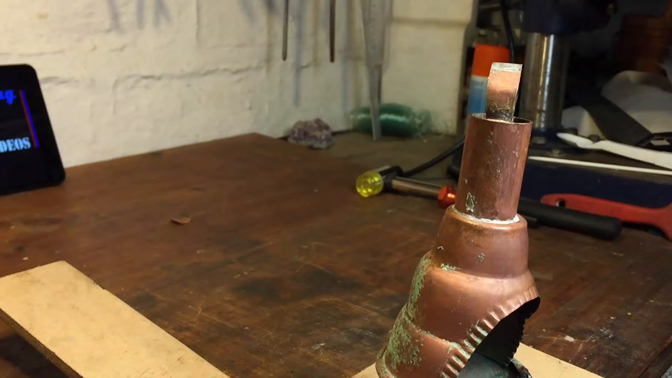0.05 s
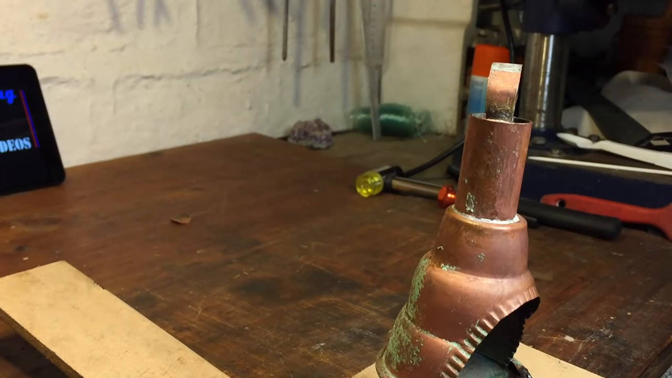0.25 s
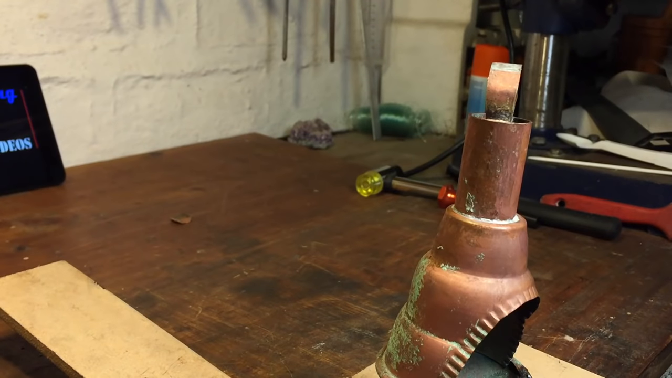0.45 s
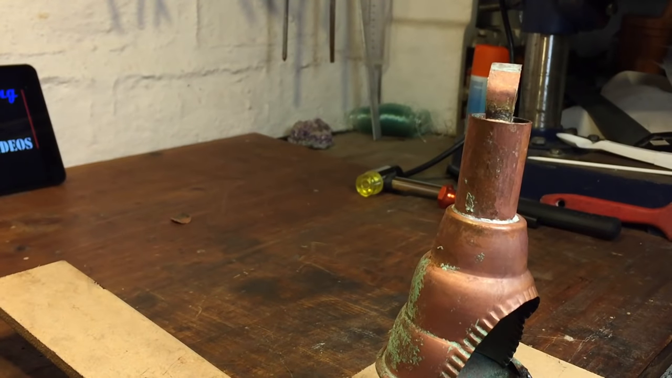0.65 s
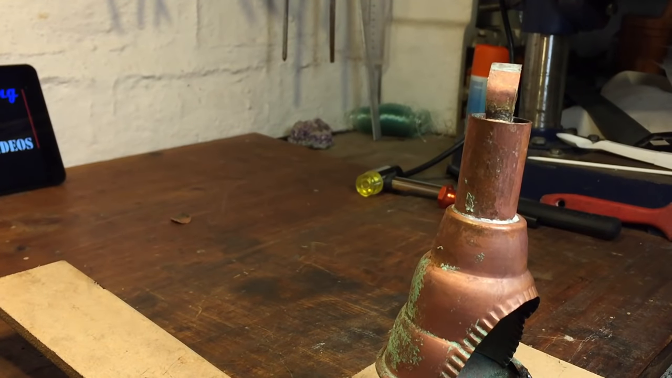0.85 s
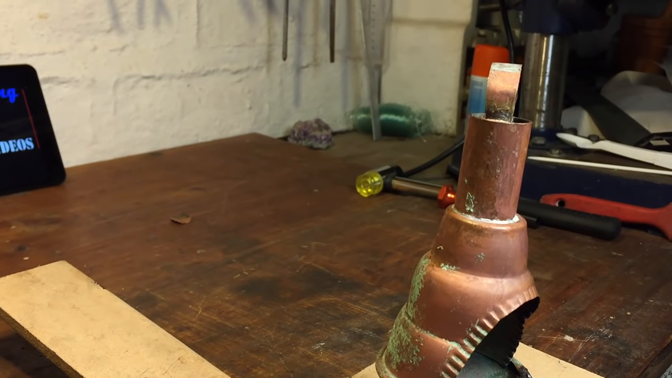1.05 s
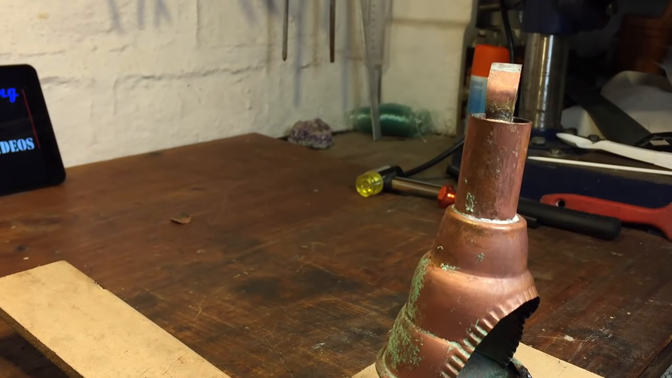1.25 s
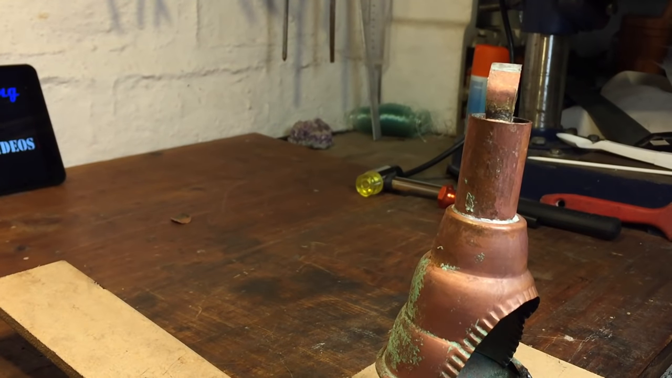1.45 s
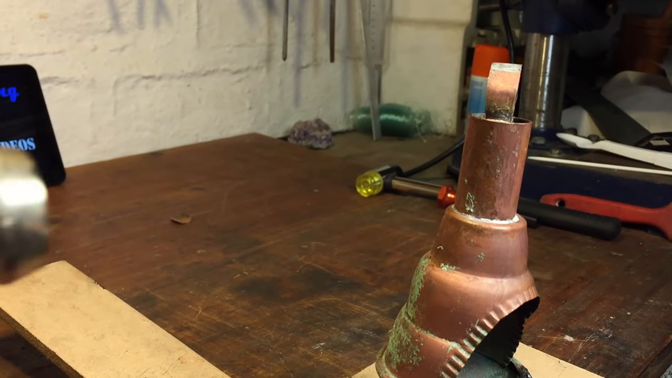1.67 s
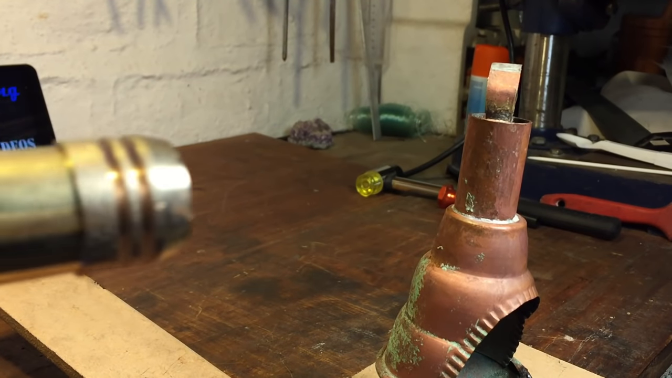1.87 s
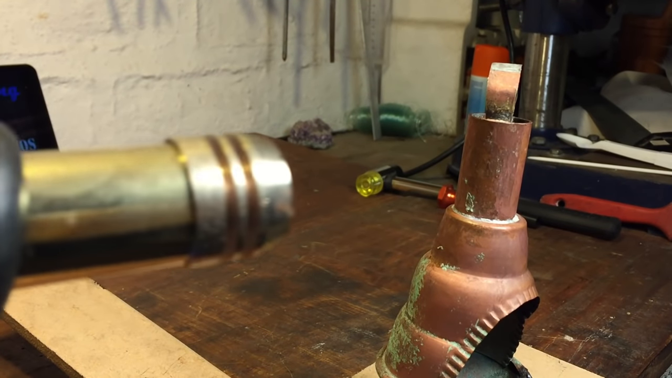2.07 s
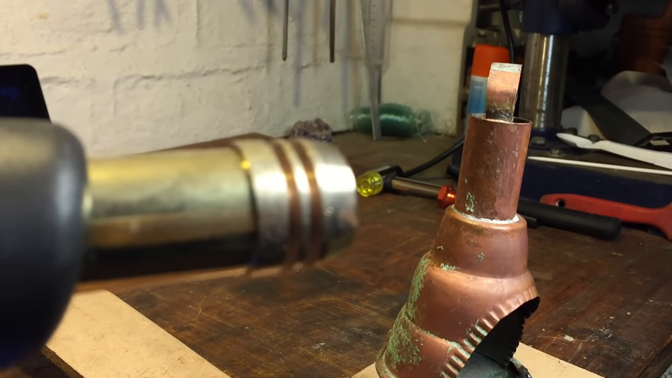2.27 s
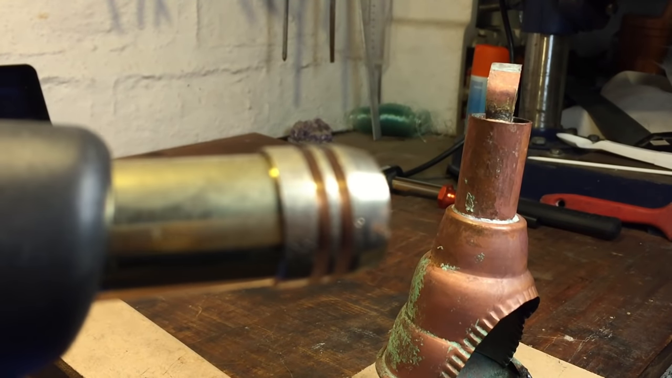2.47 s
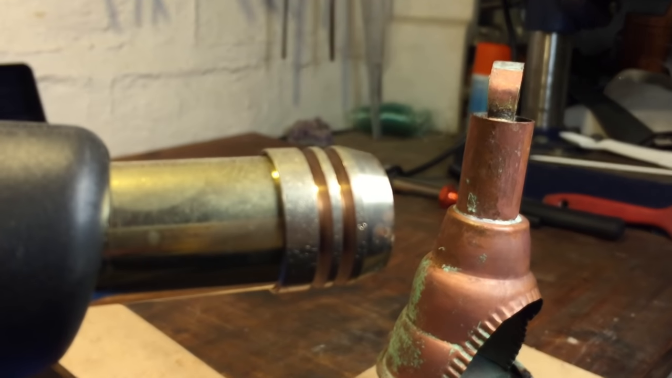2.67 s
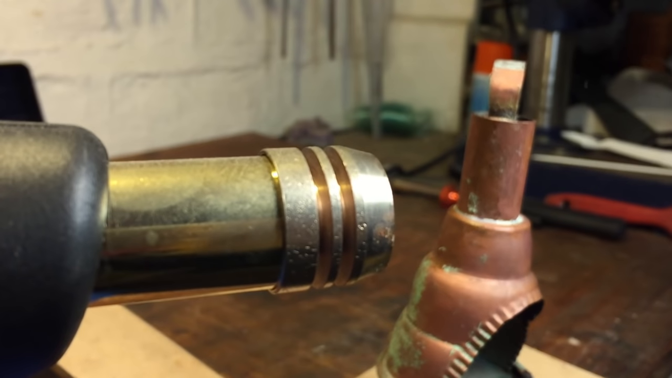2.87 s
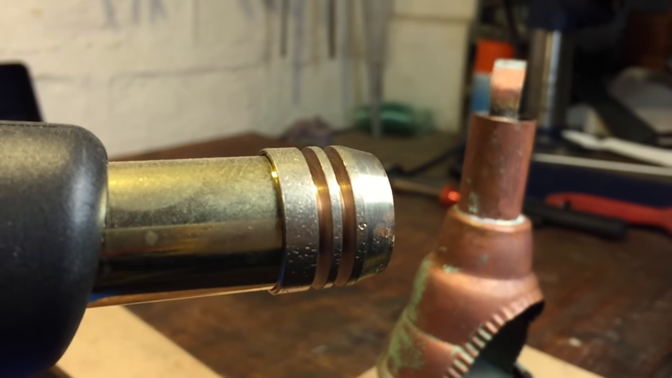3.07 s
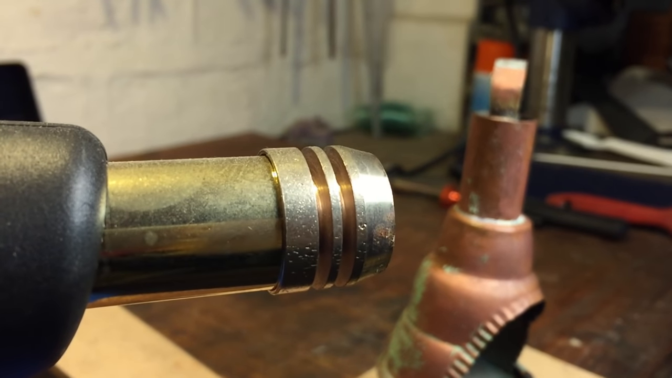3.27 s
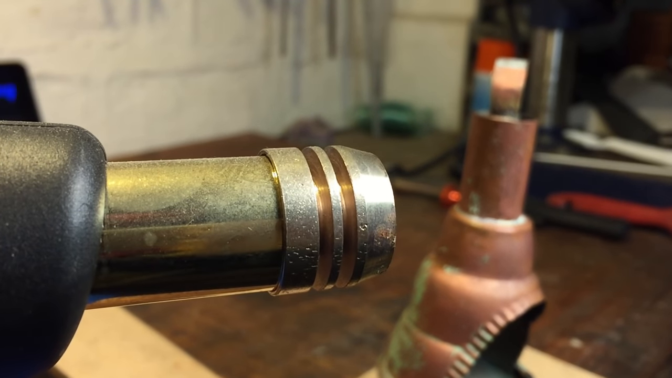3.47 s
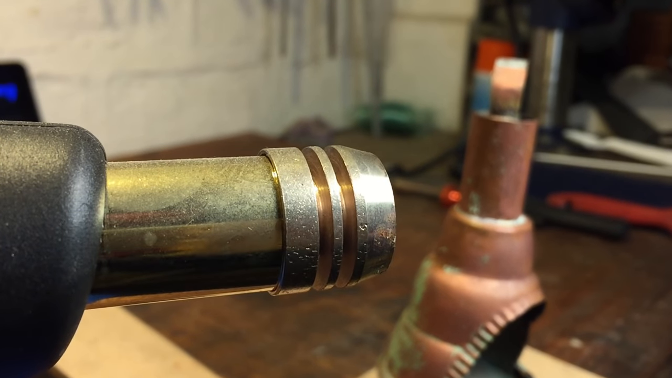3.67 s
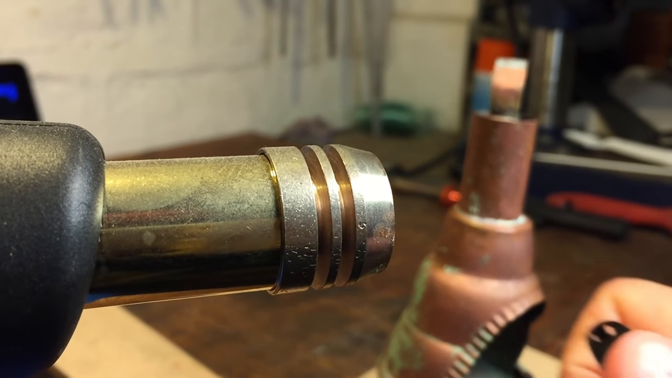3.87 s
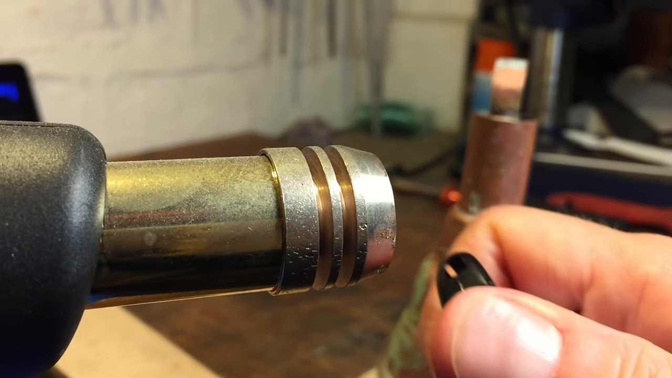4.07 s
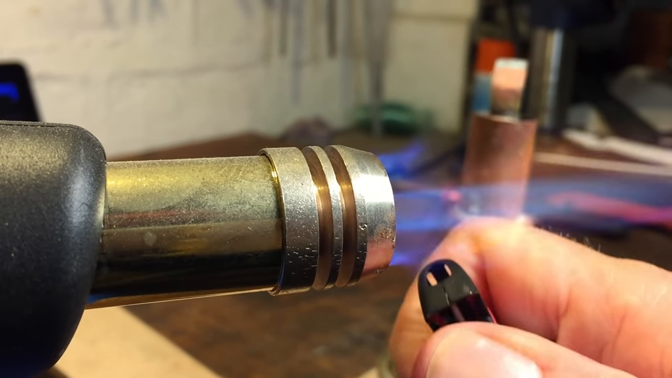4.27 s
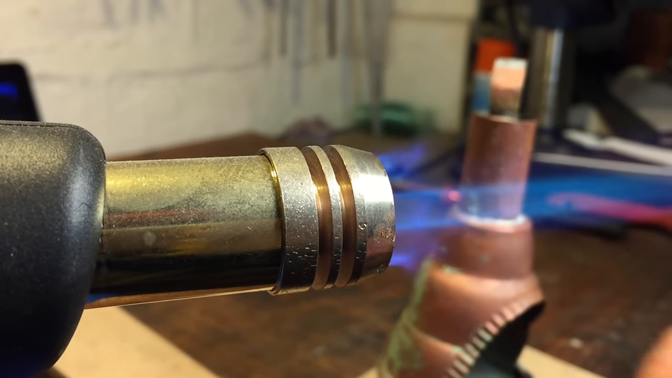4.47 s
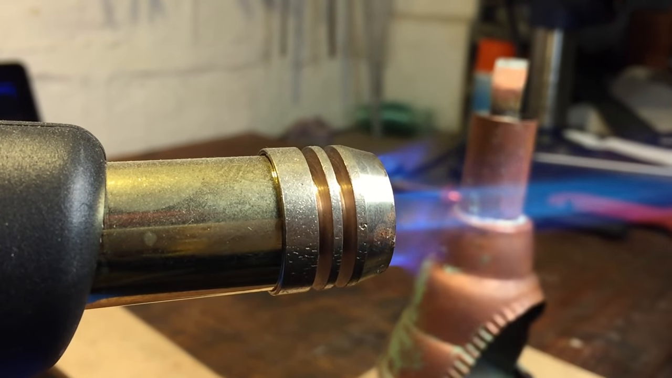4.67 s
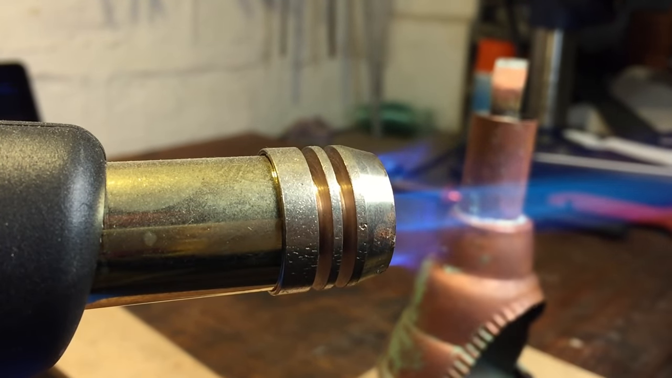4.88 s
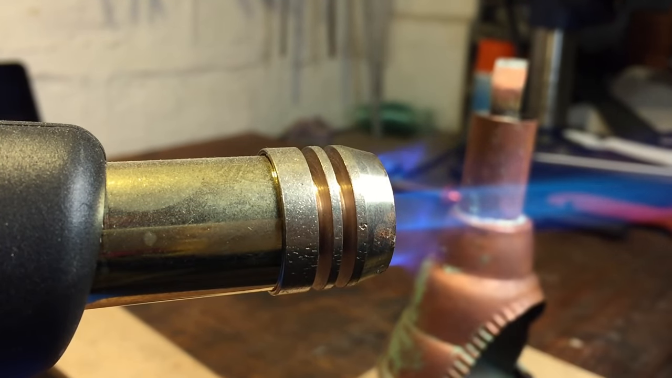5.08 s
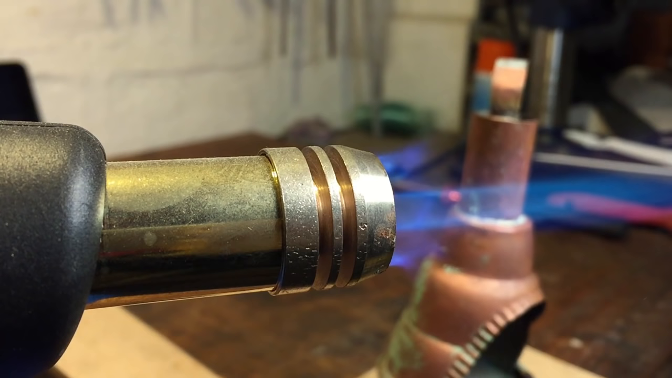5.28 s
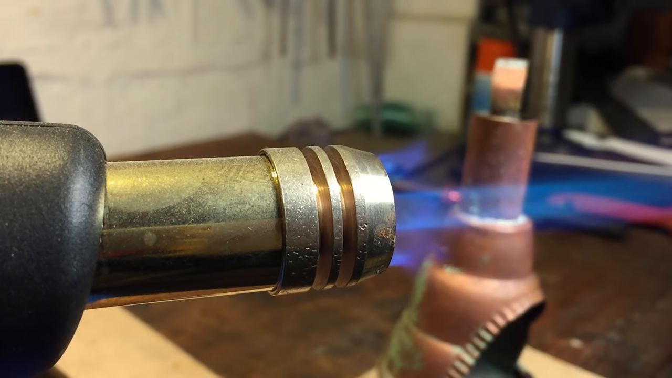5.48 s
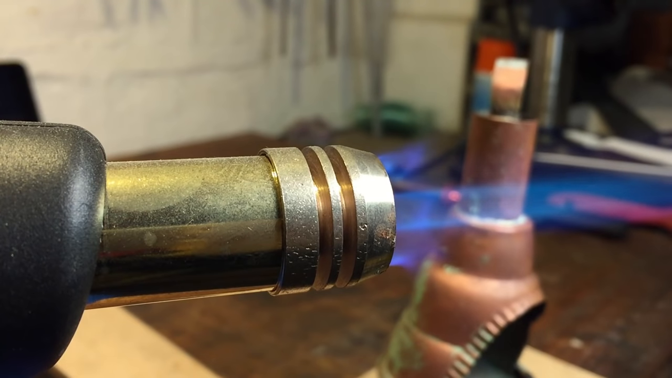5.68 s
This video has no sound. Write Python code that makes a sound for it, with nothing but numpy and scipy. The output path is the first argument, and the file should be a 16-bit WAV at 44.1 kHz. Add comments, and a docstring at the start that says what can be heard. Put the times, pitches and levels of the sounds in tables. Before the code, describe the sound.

A close recording in a quiet workshop, with birds outside spread wide in stereo. Soft low room tone drops out at about 0.1 s and returns much fainter at 0.65 s. Falling whistles, stronger on the left, come at 0.3, 0.8 and 1.4 s, with long echoes; faint low throbs lean right. From 1.2 to 2.5 s a torch base slides over a wooden bench, a soft woody rub with gritty hiss, fullest near 1.6 s. Chirps, warbles, a dim coo and a faint trill continue until about 4 s, among barely audible handling ticks. At 3.96 s gas hisses out abruptly, bright and whistly. A lighter clicks sharply at 4.04 s, weakly at 4.21 s, then hard at 4.25 s as the gas catches with a short, punchy thump and brief flare. A steady fluttering roar with bright hiss follows to the end; one more sharp click at 4.48 s.

```python
"""A gas torch in a workshop: the valve opens with a hiss, a lighter is struck, the gas catches with a thump
and burns with a steady roar. Jet and roar are shaped noise, the thump is a drawn pressure pulse.
Before that the torch slides across a wooden bench: random grains ringing modes, with hiss above.
Birds outside are gliding near-sines with echoes. Indoor sounds are mono, the birds wide, low throbs lean
right; the room tone drops out for half a second near the start."""
import sys
import numpy as np
from scipy import signal
from scipy.fft import rfft, irfft, next_fast_len
from scipy.io import wavfile

SR = 44100
rng = np.random.default_rng(int(sys.argv[2]) if len(sys.argv) > 2 else 0)


def wav_out(sig):
    """Save sig, one row per channel (or a flat mono array), as 16-bit PCM at SR to the path in sys.argv[1]."""
    wavfile.write(sys.argv[1], SR, np.round(np.clip(np.atleast_2d(sig).T, -1, 1) * 32767).astype(np.int16))


N = 252693
SHARES = np.linspace(0, 1, 33)  # points along one bird note


def amp(db):
    """Amplitude from dB."""
    return 10 ** (np.asarray(db) / 20)


def rms_one(x):
    """Scale to rms 1."""
    return x / np.sqrt(np.mean(x ** 2) + 1e-20)


def clock():
    """Time of every sample, s."""
    return np.arange(N) / SR


def in_time(rows, outside=-120):
    """Columns interpolated along the time axis, silent outside the rows."""
    s, *columns = np.transpose(rows)
    return [np.interp(clock(), s, c, left=outside, right=outside) for c in columns]


def bins():
    """Frequency bins, Hz."""
    size = next_fast_len(N)
    return np.maximum(np.arange(size // 2 + 1) * SR / size, 1)


def slope(points):
    """Gain on the bins from (freq_hz, gain_db) points, straight over log frequency."""
    hz, db = np.transpose(points)
    return amp(np.interp(np.log(bins()), np.log(hz), db))


def peaks(modes, bed_db=-80):
    """Gain on the bins from resonances whose powers add, over a flat bed."""
    power = amp(2 * bed_db)
    for hz, width_hz, db in modes:
        power = power + amp(2 * db) / (1 + (2 * (bins() - hz) / width_hz) ** 2)
    return np.sqrt(power)


def noise(gain, source=None):
    """Noise (white unless given) through a gain; rms 1."""
    source = rng.standard_normal(N) if source is None else source
    size = next_fast_len(N)
    return rms_one(irfft(rfft(source, size) * gain, size)[:N])


def drift(rate_hz):
    """Slow random curve, spread 1."""
    return noise(1 / (1 + (bins() / rate_hz) ** 2))


def place(voice, pan_db, lag_ms):
    """Direction as left-minus-right level and a delay of the right side."""
    late = np.interp(clock() - lag_ms / 1000, clock(), voice)
    return np.array([voice * amp(pan_db / 2), late * amp(-pan_db / 2)])


VALVE_S, CATCH_S = 3.959, 4.248
PULL_S, PUSH_S = 0.00404, 0.0122  # durations of the ignition pulse
UNLIT_DB, LIT_DB, ROAR_DB, JET_BED_DB = -44.5, -44.5, -37, -38  # bed: jet noise between the modes
SETTLE_DB, SETTLE_S = 0.5, 0.084  # initial weakness of the flame, time constant
# burner tube modes: freq_hz, width_hz, unlit_db, lit_db
TUBE = [(1800, 300, -12.5, -16), (2240, 390, -11, -10.5), (3835, 260, -31, -5), (4380, 154, 5, -6.5),
        (6720, 293, 3.5, -0.5), (8650, 250, -2.5, -10), (9350, 390, -4.5, -20), (11030, 430, -2, -0.5),
        (12300, 760, -10, -14.5), (13700, 300, -19, -19), (15100, 500, -15, -16.5)]
# roar spectrum: freq_hz, density_db_per_hz
ROAR = [(15, -41), (25, -17), (48, -18), (90, -5), (213, -2), (459, -5.5), (563, -2), (674, -8), (904, -5),
        (2330, -14.5), (3270, -20.5), (4390, -19.5), (5500, -32), (7150, -48), (12100, -120)]


def torch():
    """The jet hisses through the tube modes; once lit, the flame adds a fluttering roar."""
    hz, width_hz, unlit_db, lit_db = np.transpose(TUBE)
    since_s = clock() - CATCH_S
    opening = np.clip((clock() - VALVE_S) / .003, 0, 1) * (since_s < .002)
    cold_gain = peaks(zip(hz, width_hz, unlit_db), JET_BED_DB) * slope([(300, -4.0), (1300, -14), (1700, -9)])
    cold = noise(cold_gain) * opening * amp(UNLIT_DB + 0.97 * drift(60))

    weak_db = SETTLE_DB * np.exp(-np.abs(since_s) / SETTLE_S)
    jet_db = np.where(since_s > 0, LIT_DB - weak_db, -120)
    hot_gain = peaks(zip(hz, width_hz, lit_db), JET_BED_DB) * slope([(1000, 8), (3500, -0.5)])
    hot = noise(hot_gain) * amp(jet_db + 0.95 * drift(30))

    roar_db = np.where(since_s > PULL_S + PUSH_S, ROAR_DB - weak_db + 0.76 * drift(8.0), -120)
    roar = noise(slope(ROAR)) * amp(0.88 * drift(35))
    roar -= 0.07 * (roar ** 2 - 1)  # puffs of burning gas lean one way
    return cold + hot + roar * amp(roar_db)


THUMP_SCALE = 0.2
FLARE_DB, FLARE_T60_S = -30.5, 0.27  # bright hiss of the spare gas burning off
# turbulent rush of flame: time_s, level_db
RUSH = [(4.248, -35), (4.262, -33), (4.268, -19.5), (4.277, -25), (4.283, -29), (4.3, -42), (4.36, -53)]


def catch():
    """The pooled gas lights: a short pull, a longer push that breaks off, a rebound, then a rough rush."""
    t = clock() - CATCH_S
    pull = -np.sin(np.pi * np.clip(t / PULL_S, 0, 1) ** 0.75)
    pushed = np.clip((t - PULL_S) / PUSH_S, 0, 1)
    break_off = np.clip((1 - pushed) / .07, 0, 1)
    push = np.sin(0.84 * np.pi * pushed) ** 0.84 * (1.2 - 0.49 * pushed) * break_off
    rebounded = np.clip((t - PULL_S - PUSH_S) / .018, 0, 1)
    rebound = -.35 * np.clip(np.sin(np.pi * rebounded), 0, 1) ** 0.27

    rush = noise(slope([(40, -16), (150, 3), (500, -10.0), (2500, -15.5), (4000, -19.5), (16000, -50)]))
    flare = noise(slope([(3500, -20), (5000, 5.5), (6200, -8), (7500, -6), (10000, 0.5), (16000, -12)]))
    flare *= (t > 0) * amp(FLARE_DB - 60 * np.abs(t) / FLARE_T60_S)
    return THUMP_SCALE * (pull + push + rebound) + amp(in_time(RUSH)[0]) * rush + flare


def clicks(events, tail_db, tail_t60):
    """Short rattles of hard contacts in a broad resonance, each with a faint tail from the room."""
    out = np.zeros(N)
    t = np.arange(SR // 10) / SR
    for s, peak_db, rattle_ms, hz, width_hz in events:
        rattle_s = rattle_ms / 1000
        radius = np.exp(-np.pi * width_hz / SR)
        contact = (t < rattle_s) * np.exp(-.5 * t / rattle_s)
        shape = contact + amp(tail_db - 60 * t / tail_t60)
        poles = [1, -2 * radius * np.cos(2 * np.pi * hz / SR), radius ** 2]
        rattle = signal.lfilter([1, 0, -1], poles, rng.standard_normal(len(t)) * shape)
        at = round(s * SR)
        out[at:at + len(t)] += amp(peak_db) * rattle / np.abs(rattle).max()
    return out


# lighter strikes: start_s, peak_db, rattle_ms, centre_hz, width_hz
STRIKES = [(4.0425, -12.5, 1.58, 6600, 8900), (4.2075, -29.5, 1.7, 1190, 1800),
           (4.248, -6.5, 2.27, 8650, 12000), (4.4778, -8, 1.9, 9700, 10400)]


def lighter():
    """Hard strikes as resonant noise bursts."""
    return clicks(STRIKES, tail_db=-8.0, tail_t60=0.03)


RUB_OVER_DB = 1  # base level above the mean of plank_db and grit_db
WHISPER_HZ, WHISPER_WIDTH_HZ = 6160, 1100
# torch base sliding: time_s, plank_db, grit_db
SLIDE = [(1.2, -79, -84), (1.334, -63.5, -76), (1.388, -54.5, -69), (1.57, -48.5, -63.5),
         (1.706, -51, -68.5), (1.936, -56.5, -64.5), (2.034, -56, -64.5), (2.154, -62, -68.5),
         (2.432, -69.5, -85), (2.55, -84, -85)]
# plank modes: freq_hz, width_hz, gain_db
BENCH = [(108, 25, -3), (193, 19.4, 1), (301, 17, -6), (416, 81, -9), (593, 93, -5), (846, 60, -8),
         (1050, 82, -19.5), (1320, 240, -21.5)]
# modes of the sliding base: freq_hz, width_hz, level_db
RUB = [(1480, 980, -8), (2300, 360, -5), (2660, 490, 0), (3290, 470, -4.5), (3920, 940, -4),
       (4570, 660, -14.5)]
# rubbing hiss spectrum: freq_hz, density_db_per_hz
GRIT = [(4000, -24), (6800, -3), (7800, -2), (9000, -7.5), (12000, -5), (16000, -6.5)]
# swells of a hiss band: centre_s, half_width_s (to 1/e), level_db
WHISPERS = [(1.53, 0.14, -68.5), (2.05, 0.16, -67.5)]


def slide():
    """Stick-slip grains ring the plank; noise rings the base, each mode coming and going; grit hisses above."""
    plank_db, grit_db = in_time(SLIDE)
    hits = rng.random(N) < 5000 / SR  # about 5000 grains per s
    grains = rng.standard_normal(N) * amp(1.2 * rng.exponential(1, N)) * hits
    plank = noise(peaks(BENCH, bed_db=-37.0), grains) * amp(plank_db + 1.1 * drift(21))

    base = np.zeros(N)
    for hz, width_hz, db in RUB:
        base += noise(peaks([(hz, width_hz, 0)]) ** 2) * amp(db + 3.8 * drift(7.9))
    base = rms_one(base) * amp((plank_db + grit_db) / 2 + RUB_OVER_DB)

    swells = sum(amp(db) * np.exp(-((clock() - s) / half_s) ** 2) for s, half_s, db in WHISPERS)
    whisper = noise(peaks([(WHISPER_HZ, WHISPER_WIDTH_HZ, 0)]) ** 2) * swells
    grit = noise(slope(GRIT)) * amp(grit_db + 2.6 * drift(23))
    return plank + base + whisper + grit


# faint handling ticks: start_s, peak_db, rattle_ms, centre_hz, width_hz
TICKS = [(2.407, -58, 2, 5000, 8000), (3.0, -60, 6, 1900, 700), (3.365, -56.5, 5.2, 2300, 2500),
         (3.783, -62.5, 61, 1060, 120)]


def handling():
    """Faint contacts as resonant noise bursts."""
    return clicks(TICKS, tail_db=-30, tail_t60=.05)


def sing(notes, flutter_db=2.5):
    """Near-sine notes with soft ends; moving air makes them flutter."""
    out = np.zeros(N)
    for rows in notes:
        s, hz, db = np.transpose(rows)
        t = np.arange(s[0], s[-1], 1 / SR)
        phase = 2 * np.pi * np.cumsum(np.interp(t, s, hz)) / SR
        ends = np.clip(np.minimum(t - s[0], s[-1] - t) / 0.0022, 0, 1)
        at = round(s[0] * SR)
        out[at:at + len(t)] += np.sqrt(2) * amp(np.interp(t, s, db)) * ends * np.sin(phase)
    return out * amp(flutter_db * drift(70))


def note(s, length_s, hz, db):
    """Rows (time_s, pitch_hz, level_db) along one note."""
    return np.column_stack([s + length_s * SHARES, hz, db])


def shaped(rows, shape):
    """One shape stretched and pitched for every row."""
    at, ratio, swell_db = np.transpose(shape)
    return [np.column_stack([s + length_s * at, hz * ratio, db + swell_db]) for s, length_s, hz, db in rows]


def curved(rows, edge_db, order=2):
    """The pitch bends through first, middle and last; the ends are weaker."""
    u = 2 * SHARES - 1
    notes = []
    for s, length_s, first_hz, mid_hz, last_hz, db, *_ in rows:
        bend_hz = (first_hz + last_hz) / 2 - mid_hz
        hz = mid_hz + (last_hz - first_hz) / 2 * u + bend_hz * u ** 2
        notes.append(note(s, length_s, hz, db - edge_db * u ** order))
    return notes


# rising whistles: start_s, length_s, held_hz, slide_time_constant_s, first_db, last_db
RISING_WHISTLE = [(1.435, .078, 4334, 0.0052, -53, -57), (1.65, .075, 4290, 0.0055, -51.5, -54),
                  (1.915, .12, 4590, 0.0082, -51.5, -64), (3.712, .07, 4540, .009, -51, -59.5),
                  (3.953, 0.049, 4420, .012, -60, -52)]
RISE_DEPTH, SAG_HZ_PER_S = .25, 1100  # depth: share of held_hz
RISE_EDGE_DB, RISE_IN_S, RISE_OUT_S = 8, 0.011, 0.018


def rising():
    """The pitch closes in on the held note, which sags steadily."""
    notes = []
    for s, length_s, held_hz, slide_s, first_db, last_db in RISING_WHISTLE:
        t = length_s * SHARES
        edge = np.clip(1 - t / RISE_IN_S, 0, 1) + np.clip(1 - (length_s - t) / RISE_OUT_S, 0, 1)
        hz = held_hz * (1 - RISE_DEPTH * np.exp(-t / slide_s)) - SAG_HZ_PER_S * t
        db = first_db + (last_db - first_db) * SHARES - RISE_EDGE_DB * edge
        notes.append(note(s, length_s, hz, db))
    return notes


# warble notes: start_s, length_s, top_hz, top_share (of length), level_db
WARBLE = [(2.386, 0.034, 3300, .22, -59.5), (2.448, 0.041, 3150, 0.397, -58),
          (2.584, 0.032, 3510, 0.47, -56), (2.629, .052, 3467, 0.394, -56), (2.694, .073, 3590, .4, -58)]
ARCH_UP, ARCH_DOWN, ARCH_EDGE_DB = 0.273, .22, 9  # share of pitch lost at start and end, level lost there


def arches():
    """Up to a rounded top and down again, loudest at the top."""
    notes = []
    for s, length_s, top_hz, top, db in WARBLE:
        up = np.clip(1 - SHARES / top, 0, 1) ** 2
        down = np.clip((SHARES - top) / (1 - top), 0, 1) ** 2
        hz = top_hz * (1 - ARCH_UP * up - ARCH_DOWN * down)
        notes.append(note(s, length_s, hz, db - ARCH_EDGE_DB * (up + down)))
    return notes


TRILL_START_S, TRILL_PERIOD_S, TRILL_COUNT = 3.253, 0.051, 7
TRILL_TOP_HZ, TRILL_END_HZ, TRILL_HELD_HZ, TRILL_DB = 8450, 7650, 7300, -71.5


def trill():
    """A falling voice and a lower, nearly held one, repeated evenly at uneven levels."""
    starts = TRILL_START_S + TRILL_PERIOD_S * np.arange(TRILL_COUNT)
    levels = TRILL_DB + 2.2 * rng.standard_normal((TRILL_COUNT, 2))
    notes = []
    for s, (fall_db, held_db) in zip(starts, levels):
        notes.append([(s, TRILL_TOP_HZ, fall_db), (s + .007, TRILL_TOP_HZ - 150, fall_db),
                      (s + .022, TRILL_END_HZ, fall_db - 7)])
        notes.append([(s - .008, TRILL_HELD_HZ, held_db - 6.0),
                      (s + 0.0053, TRILL_HELD_HZ - 100, held_db - 6.0)])
    return sing(notes)


# falling whistles and swoops: start_s, length_s, pitch_hz, level_db
FALLING_WHISTLE = [(.265, .235, 3340, -67.5), (.78, .25, 3385, -64.5), (1.41, .35, 3350, -59.5)]
SWOOPS = [(2.98, .088, 6520, -58), (3.16, .088, 6420, -57.5)]
# their shapes: length_share, pitch_ratio, level_db
FALL_SHAPE = [(0, 1, -20), (.04, 0.95, -6.5), (.1, .925, -5.5), (.24, 0.88, -14), (.45, 0.85, -0.5),
              (.6, .812, -4), (.76, .797, -9.5), (1, .79, -20)]
SWOOP_SHAPE = [(0, 1, -18), (.28, .985, -3), (.44, .96, -15), (.56, .93, -2.5), (.83, .857, -0.5),
               (1, 0.751, -10)]
# one thin whistle: time_s, pitch_hz, level_db
THIN_WHISTLE = [(2.635, 7060, -78), (2.645, 7410, -65), (2.67, 7510, -62.5), (2.71, 7450, -62),
                (2.743, 7360, -76), (2.765, 7370, -62), (2.81, 7350, -61.5), (2.9, 7100, -72)]
# dove coos: start_s, length_s, first_hz, middle_hz, last_hz, level_db
COOS = [(.245, 0.093, 481, 482, 479, -91), (2.835, 0.36, 503, 524, 527, -76.5),
        (3.355, .115, 490, 496, 466, -79), (3.49, .06, 466, 468, 478, -83)]
# chirps: start_s, length_s, first_hz, middle_hz, last_hz, level_db, left_minus_right_db
CHIRPS = [(0.11, .026, 4670, 5100, 3900, -78, 2), (0.14, 0.026, 3850, 3780, 3750, -83, 0),
          (0.174, .014, 3500, 3300, 3000, -86, -1.5), (.18, .03, 3430, 3750, 3800, -88, -1.5),
          (2.158, .03, 4580, 4770, 3700, -65, -4), (2.188, .013, 3550, 3640, 3750, -67, 0.1),
          (2.212, 0.0082, 4900, 5100, 5300, -68, 0.1), (2.222, .032, 4270, 5120, 3600, -65, 0.1),
          (2.265, 0.0214, 4500, 4200, 3900, -69, 0.1), (2.297, .015, 3900, 4070, 4250, -66.5, 0.1),
          (2.41, .038, 3930, 4000, 3680, -72, 5.5), (2.422, 0.0225, 2530, 2470, 2430, -66, 7),
          (2.482, .045, 3860, 3550, 3000, -69, 7), (2.49, .028, 2550, 2430, 2300, -70, 5.5),
          (2.612, 0.029, 3900, 3930, 4000, -70, 5.5), (2.665, 0.032, 3870, 3810, 3560, -72, 5.5),
          (2.87, 0.022, 4260, 4360, 4830, -72, -1.5), (3.679, 0.025, 4300, 4870, 5470, -68, -1.5),
          (3.68, 0.032, 2200, 2760, 3400, -73, -1.5), (3.684, .026, 3230, 4300, 5050, -66, -1.5),
          (3.709, .009, 4950, 4650, 4300, -64, -1.5), (3.714, 0.048, 3200, 3750, 4200, -68, 4),
          (3.755, 0.024, 4770, 5280, 4950, -64, 1), (3.772, 0.024, 4500, 4344, 4310, -53.5, -1.5),
          (3.775, .022, 4150, 3950, 3850, -67, -1), (3.806, 0.042, 3650, 3900, 4100, -69, -1.5),
          (3.862, .013, 3700, 4030, 4370, -74, 3), (3.936, 0.022, 2640, 3070, 3500, -71, -1.5)]
COO_EDGE_DB, CHIRP_EDGE_DB = 6, 2


def birds(near_db=-7.5, near_t60=0.15, far_db=-8.5, far_t60=1.24):
    """Each bird has its direction; near walls smear the notes, far trees return a long scattered echo."""
    chirp_rows = np.array(CHIRPS)
    chirp_pan_db = np.interp(clock(), chirp_rows[:, 0], chirp_rows[:, -1])
    coos = sing(curved(COOS, COO_EDGE_DB, order=6), flutter_db=1.5)
    direct = place(sing(shaped(FALLING_WHISTLE, FALL_SHAPE)), pan_db=8.5, lag_ms=0.063)
    direct += place(sing(rising()), pan_db=-1.5, lag_ms=0.049)
    direct += place(sing(arches()), pan_db=5.5, lag_ms=0.049)
    direct += place(sing([THIN_WHISTLE]) + trill(), pan_db=0.0, lag_ms=0.03)
    direct += place(sing(shaped(SWOOPS, SWOOP_SHAPE)), pan_db=3.0, lag_ms=0.041)
    direct += place(coos, pan_db=14.5, lag_ms=0.52)
    direct += place(sing(curved(CHIRPS, CHIRP_EDGE_DB)), pan_db=chirp_pan_db, lag_ms=0.022)

    t = np.arange(SR) / SR
    shared, own = rng.standard_normal(SR), rng.standard_normal((2, SR))
    near = amp(near_db - 60 * t / near_t60) / np.sqrt(near_t60)
    far = amp(far_db - 60 * t / far_t60) / np.sqrt(far_t60)
    echoes = (0.58 * shared + 0.67 * own) * (near + far) * (t > .006)
    echoes *= np.sqrt(2 * np.log(1000) / SR)  # evens the energy for any t60
    return direct + signal.fftconvolve(direct, echoes, axes=1)[:, :N]


RASP_START_S, RASP_PERIOD_S, RASP_COUNT = .155, 0.097, 3.6  # the last rasp is cut short
RASP_DECAY_S, RASP_DB, GARDEN_DB = .05, -84, -86.5  # levels before the side is added
# far birds and leaves: freq_hz, density_db_per_hz
GARDEN = [(20, -23), (300, -12.5), (1200, -20.5), (2450, -28), (2660, 1.5), (2950, -17), (3500, -27),
          (5500, -25), (6500, -15.5), (7500, -30), (10000, -32)]


def outdoors():
    """Far birds and leaves as shaped noise with decaying high rasps, partly different on each side."""
    since_s = clock() - RASP_START_S
    active = (since_s > 0) * (since_s < RASP_COUNT * RASP_PERIOD_S)
    rasping = active * np.exp(-(since_s % RASP_PERIOD_S) / RASP_DECAY_S)
    rasp_gain = slope([(4000, -31), (5500, -4), (6600, 0), (9000, -12), (10500, -35)])
    mid, side = [amp(GARDEN_DB) * noise(slope(GARDEN)) + amp(RASP_DB) * rasping * noise(rasp_gain)
                 for _ in range(2)]
    return mid + 0.29 * side * [[1], [-1]]


OPENING_RUMBLE_HZ, OPENING_RUMBLE_DB = 60, -53
# room tone steps: from_s, level_db
ROOM_CUTS = [(0, -54.5), (.111, -110), (0.654, -67.5)]
# room tone spectrum: freq_hz, density_db_per_hz
ROOM = [(12, -30), (26, -24), (42, -9), (100, -13), (158, -22), (310, -23.5), (499, -29), (2530, -33.5),
        (2750, -32.5), (6180, -35), (14300, -38.5), (16000, -45)]


def room():
    """Steady shaped noise whose level steps down and up; a low rumble until the first step."""
    s, db = np.transpose(ROOM_CUTS)
    level = amp(db[np.searchsorted(s, clock(), side="right") - 1])
    rumble = noise(1 / (1 + (bins() / OPENING_RUMBLE_HZ) ** 3)) * (clock() < s[1])
    return level * noise(slope(ROOM)) + amp(OPENING_RUMBLE_DB) * rumble


THROB_HZ, THROB_SAG_S, THROB_RISE_S, THROB_FALL_S = 9.1, .13, 0.053, 0.085  # rate at the crest
# very low throbs: crest_s, peak_db (before panning)
THROBS = [(0.125, -65), (0.303, -57), (0.55, -61.6), (0.724, -55.4), (0.952, -63.5), (1.131, -58.5),
          (1.294, -53.2), (2.233, -50.5), (2.447, -51.5), (2.662, -64), (3.028, -54.5), (3.394, -54.5),
          (3.57, -52.1), (3.748, -59.4)]


def throbs():
    """Swings of pressure that slow down as they die, stronger on the right."""
    t = np.arange(-SR // 10, SR // 4) / SR
    phase = 2 * np.pi * THROB_HZ * THROB_SAG_S * np.log(np.maximum(1 + t / THROB_SAG_S, .05))
    rise = np.exp(-np.abs(t / THROB_RISE_S) ** 3)
    fall = np.exp(-(t / THROB_FALL_S) ** 2)
    pulse = np.cos(phase) * np.where(t < 0, rise, fall)
    crests = np.zeros(N)
    s, db = np.transpose(THROBS)
    crests[(s * SR).astype(int)] = amp(db)
    return place(signal.fftconvolve(crests, pulse)[SR // 10:][:N], pan_db=-4.5, lag_ms=0)


def scene():
    """Mono workshop sounds in the centre, the garden around them."""
    indoors = torch() + catch() + lighter() + slide() + handling() + room()
    return indoors + birds() + outdoors() + throbs()


HEADROOM, CUTOFF_HZ = .32, 15900


def record(dry):
    """The loudest peaks are rounded, the top is cut steeply."""
    rounded = HEADROOM * np.tanh(dry / HEADROOM)
    return signal.sosfilt(signal.ellip(12, .5, 60, CUTOFF_HZ, fs=SR, output="sos"), rounded)


dry = scene()
out = record(dry)
wav_out(out)
```